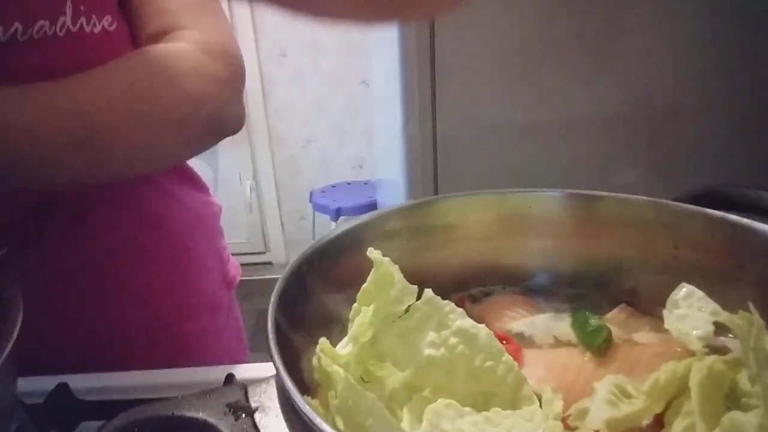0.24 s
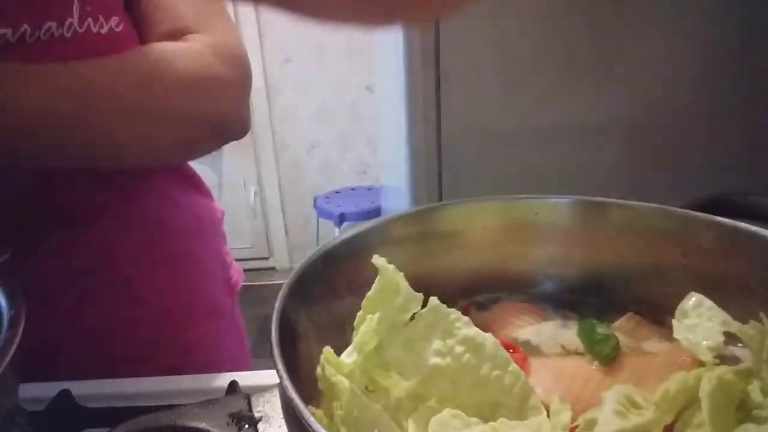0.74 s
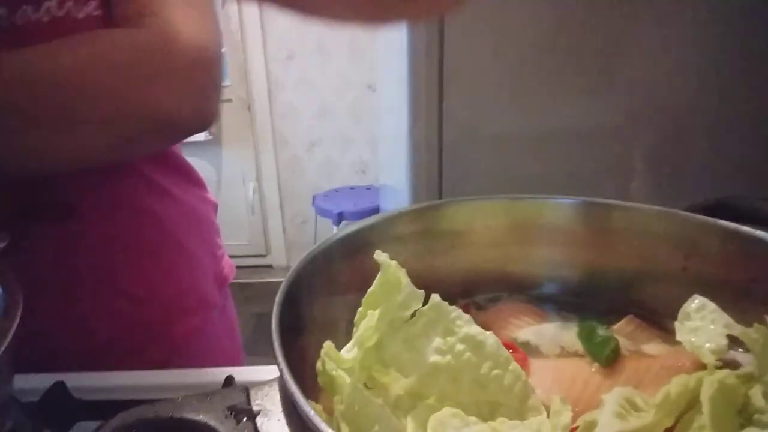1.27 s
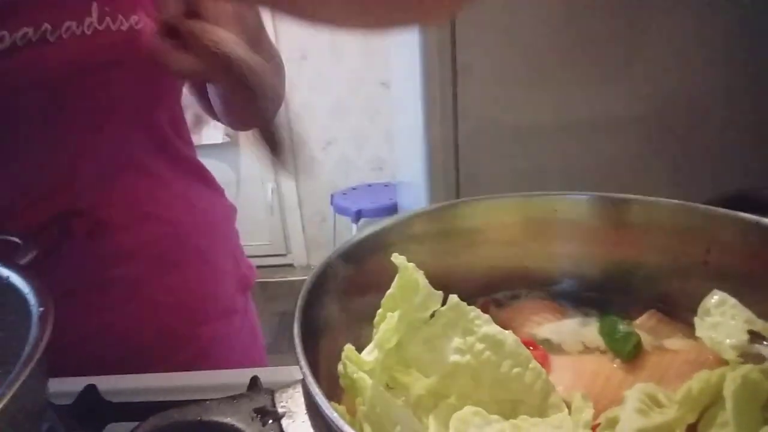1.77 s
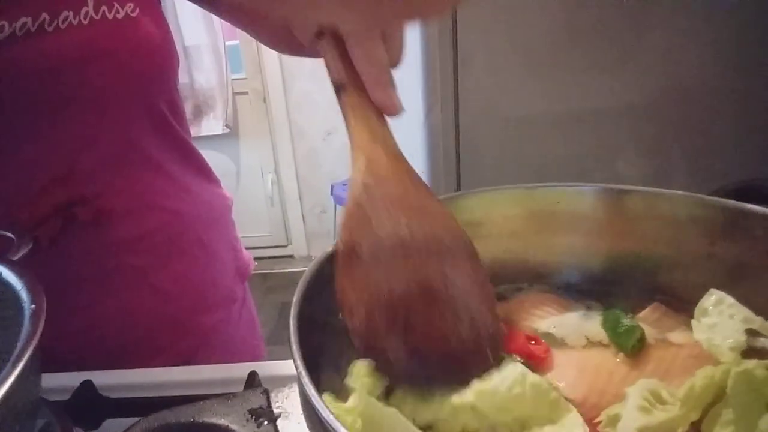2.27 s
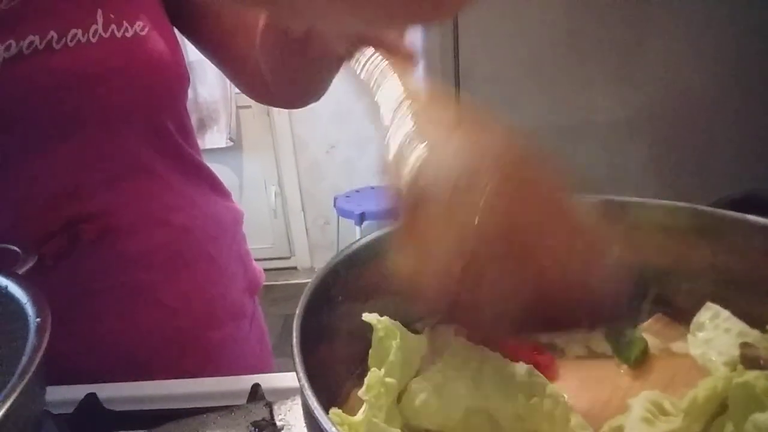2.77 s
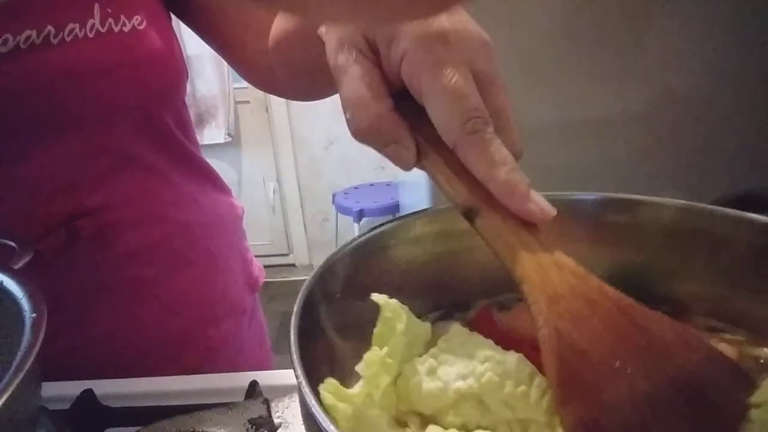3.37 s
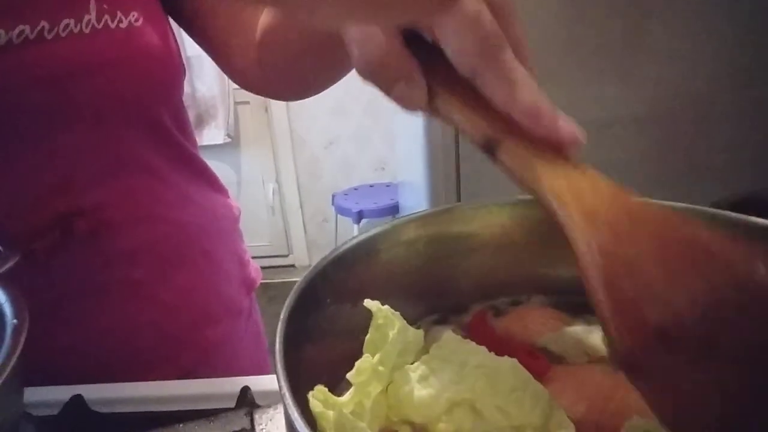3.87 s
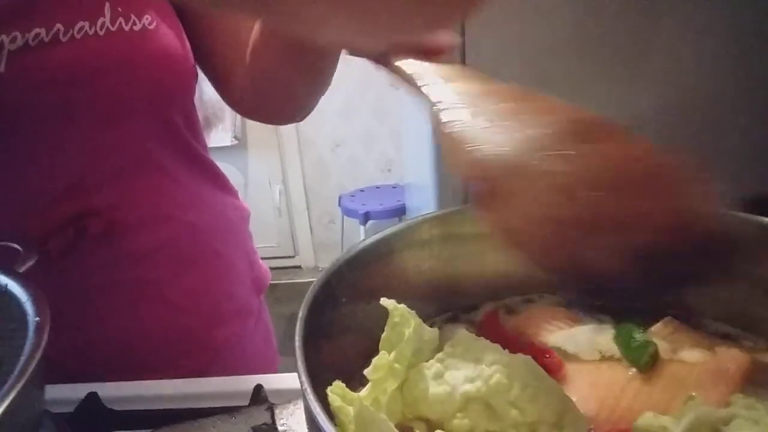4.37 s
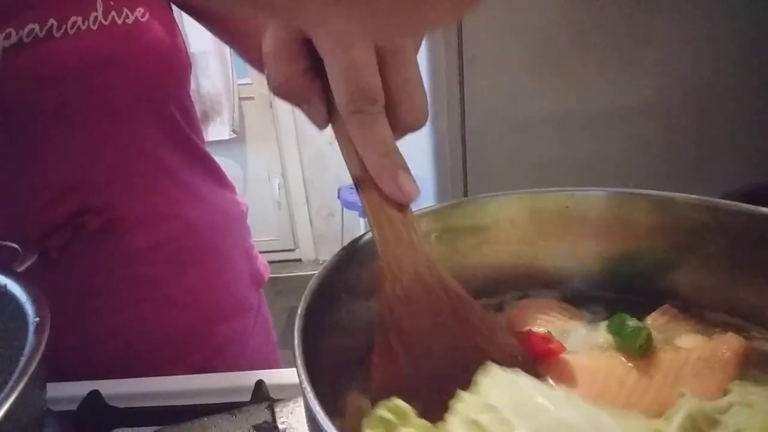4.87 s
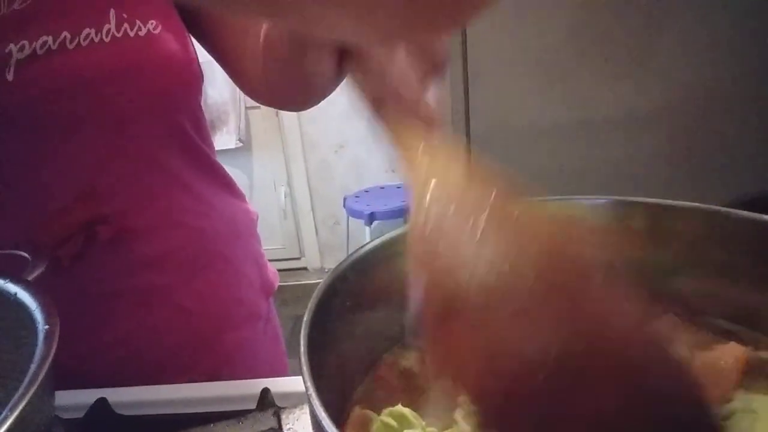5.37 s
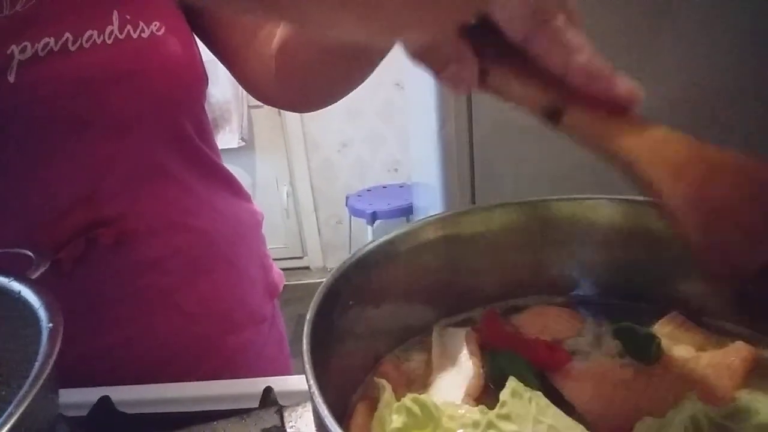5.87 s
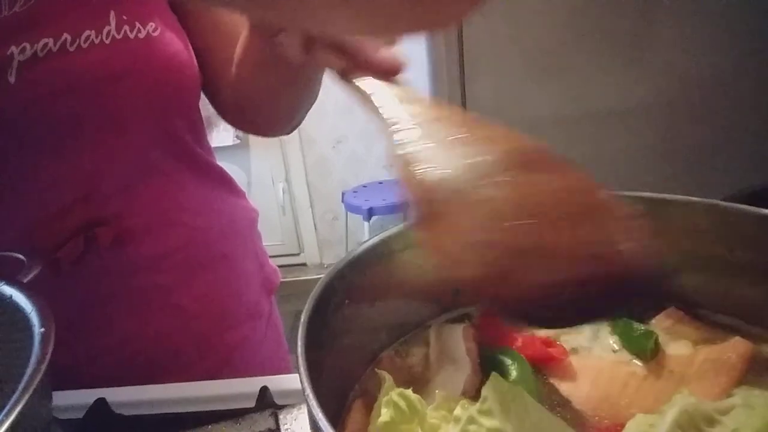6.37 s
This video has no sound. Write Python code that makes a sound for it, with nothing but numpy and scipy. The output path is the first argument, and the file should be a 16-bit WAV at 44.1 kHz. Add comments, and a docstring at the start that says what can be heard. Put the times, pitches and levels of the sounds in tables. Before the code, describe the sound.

Faint leafy crunches and light taps, then two hard, briefly ringing wooden spoon knocks on a steel pot, with a kitchen fan humming.

```python
"""Pressing cabbage into a steel pot

A wooden spoon pushes leaves and vegetables down in a full pot on a stove: they rub, snap and squeeze
bubbles out of the broth, and the spoon's edge taps. Two hard knocks excite the pot's modes, which the
food damps quickly; a softer bump comes at the end. An appliance fan hums throughout, a small kitchen
reverberates, and an automatic gain control lowers the level after the first knock."""
import sys
import numpy as np
from scipy import signal
from scipy.fft import rfft, irfft, next_fast_len
from scipy.io import wavfile
from scipy.ndimage import uniform_filter1d, map_coordinates

SR = 44100
rng = np.random.default_rng(int(sys.argv[2]) if len(sys.argv) > 2 else 0)


def transcribe(u):
    """Save the signal u as a 16-bit wav file named by the first command-line argument.

    u: samples, shape (n,) or (channels, n), limited to [-1, 1]; the rate is SR.
    q: integer samples, one column per channel.
    """
    v = np.clip(np.atleast_2d(u).T, -1, 1)
    q = np.round(v * 32767).astype(np.int16)
    wavfile.write(sys.argv[1], SR, q)


N = 292824

# Reverberation of the kitchen. Each row: frequency in Hz, t60 (time to fall 60 dB) in seconds.
KITCHEN_DECAY = [(80, 1), (300, 0.22), (1400, 0.3), (4000, 0.22), (8500, 0.22), (10000, 0.23),
                 (16000, 0.19)]
# Echoes from close walls. Each row: delay in seconds, gain in dB.
WALL_ECHOES = [(0.0097, -10.5), (0.0224, -17.5)]
# Resonances of the fan's housing. Each row: frequency in Hz, width in Hz, lift in dB.
HOUSING_RESONANCES = [(758, 210, 9.5), (1041, 32, 8.5), (1345, 47, 7.5), (1565, 150, 8.5), (2040, 25, -4),
                      (2670, 150, 10.5), (4116, 295, 10.5), (5340, 95, 10), (12030, 1250, 6.5)]
# Tones of the fan's motor. Each row: frequency in Hz, rms level in dB, waver from 0 to 1.
MOTOR_TONES = [(96.8, -57, 0.1), (169.3, -57.5, 0.37), (248.2, -60, 0.29), (1590, -63.5, 1),
               (2625, -68.5, 0.87)]
# The spoon is picked up, then slides through the leaves. Each row: start in seconds, length in seconds,
# level in dB, tilt in dB per octave, relative level of the dull bump in dB.
SPOON_STROKES = [(0.304, 0.044, -56.5, -1.5, 2), (0.419, .02, -53.5, -1, 3), (1.07, 0.054, -55.5, 2, 5.5),
                 (1.158, 0.015, -49, -2, 4.5), (1.178, 0.027, -43.5, 0, -10), (1.302, .018, -38, -0.8, -8),
                 (1.471, 0.028, -46, -4, 0.5), (2.094, 0.11, -52, 3, 1), (2.208, 0.13, -57, -2, 5),
                 (2.323, 0.22, -48, 2, -25), (3.06, 0.056, -55.5, 1, -12), (3.124, .086, -43, -0.5, -15),
                 (3.282, .1, -48.5, -1.5, -14), (3.443, 0.07, -52.5, -3.5, -1), (3.87, 0.15, -54, -3, -4),
                 (5.413, 0.046, -54, 0, -20)]
# Light taps of the spoon's edge. Each row: start in seconds, level in dB, tilt in dB per octave.
EDGE_TAPS = [(1.036, -43.5, -8), (1.0677, -34, -0.5), (1.475, -40, -5), (3.0502, -39, -11),
             (3.187, -29, -9), (3.29, -38, -14), (4.649, -31, -0.5), (4.7106, -35, -1), (4.752, -43, -6),
             (5.176, -50.5, 4), (5.437, -43, -4), (5.7133, -46, 4), (5.908, -24, -4), (6.019, -20.5, -0.5)]
# Crisp wet leaves breaking. Each row: start in seconds, level in dB.
CLEAR_SNAPS = [(1.4257, -47), (1.453, -39.5), (1.469, -47), (2.32, -41), (2.4235, -34.5), (2.5023, -33),
               (3.542, -46), (4.7002, -38), (4.7757, -33.5), (4.806, -44), (5.483, -39)]
# Blows on the pot. Each row: start in seconds, level in dB, place from 0 (upper wall) to 1 (low down),
# low cut-off in Hz, contact cut-off in Hz, crack in dB, boom in dB, boom t60 in seconds, slosh in dB.
# Crack, boom and slosh are relative to the blow's level.
SPOON_BLOWS = [(4.55, 0, 0.24, 760, 10900, -14.5, -26.5, 0.7, -38.5),
               (5.8965, 2.5, 1, 110, 3350, -15, -30, 0.6, -58),
               (6.6054, -25, 0.95, 118, 1820, -6.5, -5, 0.44, -37)]
# Broad damped modes and thin steel ring of the pot. Each row: frequency in Hz, t60 in seconds,
# level in dB when struck on the upper wall, level in dB when struck low down.
POT_MODES = [(251, 0.045, -59, -15), (272.7, 0.35, -44, -27.5), (315, 0.27, -12, -31),
             (416, 0.39, -21, -32), (532, 0.1, -54, -16.5), (614, 0.043, -26, -14.5),
             (720.5, 0.28, -25, -48), (920, 0.02, -23, -18), (992, 0.4, -26, -55), (1000, 0.062, -41, -35),
             (1215, 0.38, -29, -64), (1345, 0.24, -45, -30), (1362, 0.039, -2.5, -8),
             (1430, 0.19, -47, -31), (1464, 0.17, -25, -26.5), (1590, 0.26, -37, -35),
             (1634, 0.049, -36, -28), (1960, 0.021, -7.5, -11.5), (1840, 0.24, -42, -30),
             (2072, 0.092, -13, -41), (2125, 0.03, -37, -8.5), (2475, 0.031, -34, -15.5),
             (2430, 0.04, -36, -36), (2640, 0.022, -13.5, -10.5), (3350, 0.022, -12, -24),
             (4170, 0.056, -30, -39), (5420, 0.046, -41, -24), (8740, 0.22, -42, -39)]
# Spectra of the noisy sources. Each row: frequency in Hz, relative level in dB.
AIR_SPECTRUM = [(25, -13), (45, -10.5), (75, -1), (130, 2.5), (200, -0.5), (310, -1), (450, -6.5),
                (650, -7), (930, -12), (1350, -5), (1900, -7.5), (2750, -9), (3100, -16.5), (6500, -22),
                (10000, -26), (16000, -29.5)]  # air rushing through the fan
RUB_SPECTRUM = [(300, -38), (1000, -4), (2200, -2), (3200, -2), (5000, -2), (8000, -7), (10000, -13.5),
                (16000, -15)]  # leaves rubbing
TAP_SPECTRUM = [(700, -34), (1700, -2), (3000, -5.5), (4800, 1.5), (6000, 0), (7000, -4), (8200, -1.5),
                (9300, -9.5), (12500, -6), (16000, -17)]  # the spoon's edge
CRACK_SPECTRUM = [(300, -54), (800, 9.5), (1250, 11), (2000, -12), (3800, 1.5), (5000, 0), (6600, -10.5),
                  (7600, -2.5), (8600, -6.5), (9400, -23), (16000, -31)]  # wood striking steel
BOOM_SPECTRUM = [(30, -40), (50, -18), (66, 4), (77, 12), (92, 7.5), (200, 0), (400, -5.5), (650, -4),
                 (1200, -35)]  # the kitchen's low boom after a blow
SLOSH_SPECTRUM = [(40, -18), (90, 13), (280, 12.5), (500, 9), (750, -12.5), (1300, -38)]  # food swinging back after a blow

STIR_FROM_S = 2  # bubbles and faint snaps occur from here on


def amp(db):
    """Amplitude grows tenfold for every 20 dB."""
    return 10 ** (np.asarray(db) / 20)


def unit(x):
    """Normalisation scales a signal to rms 1."""
    return x / np.sqrt(np.mean(x ** 2) + 1e-20)


def along(points, hz):
    """Interpolation reads (Hz, value) points on a logarithmic frequency axis."""
    f, v = np.transpose(points)
    return np.interp(np.log(hz + 1), np.log(f + 1), v)


def wobble(rate, size=N):
    """A spline through random knots, rate of them a second, gives a smooth fluctuation."""
    return map_coordinates(rng.standard_normal(int(size * rate / SR) + 4), [np.arange(size) * rate / SR])


def ripple(hz, spacing_hz):
    """Small random resonances, new for every contact, ripple the spectrum."""
    return map_coordinates(rng.standard_normal(int(SR / spacing_hz) + 4), [hz / spacing_hz])


def coloured(x, gain_db):
    """Filtering multiplies the spectrum by a gain, given in dB as a function of frequency."""
    m = next_fast_len(len(x) + 8192)
    return irfft(rfft(x, m) * amp(gain_db(np.fft.rfftfreq(m, 1 / SR))), m)[:len(x)]


def noise(gain_db, size):
    """Filtered white noise takes the filter's spectrum; its rms is set to 1."""
    return unit(coloured(rng.standard_normal(size), gain_db))


def envelope(t, length, attack, release):
    """A smooth gate rises around time 0 and falls around the given length."""
    return (1 + np.tanh(t / attack)) * (1 - np.tanh((t - length) / release)) / 4


def add(track, s, sound):
    """Superposition: a sound adds to the track from s seconds on."""
    start = max(round(s * SR), 0)
    part = track[start:start + len(sound)]
    part += sound[:len(part)]


def in_kitchen(x, wet_db, build_s=0.0013):
    """Reverberation: reflections build up into a diffuse tail that decays exponentially."""
    hz, t, spectra = signal.stft(rng.standard_normal(SR // 2), SR, nperseg=256)
    decay = amp(-60 * t / along(KITCHEN_DECAY, hz)[:, None])
    tail = signal.istft(spectra * decay, SR, nperseg=256)[1]
    tail *= 1 - np.exp(-(np.arange(len(tail)) / SR / build_s) ** 2)
    return x + amp(wet_db) * signal.fftconvolve(x, tail / np.linalg.norm(tail))[:len(x)]


def fan(air_db=-48):
    """Resonance of the housing colours the rushing air, while the motor hums on a few wavering tones."""
    t = np.arange(N) / SR
    housing_db = lambda f: sum(lift / (1 + (2 * (f - hz) / width) ** 2)
                               for hz, width, lift in HOUSING_RESONANCES)
    rush = noise(lambda f: along(AIR_SPECTRUM, f) + housing_db(f), N)
    air = unit(in_kitchen(rush, wet_db=-8.5)) * amp(air_db + 0.72 * wobble(6.6))
    hum = np.zeros(N)
    for hz, db, waver in MOTOR_TONES:
        peak = np.sqrt(2) * amp(db + 1.9 * waver * wobble(6.1))
        hum += peak * np.sin(2 * np.pi * hz * t + 3 * waver * wobble(8))
    return air + hum


def strokes(grain_db=4, snaps_per_s=260, snap_db=-4, crunch_db=1.45, brush_db=-14, brush_s=0.059):
    """Friction is a swell of tiny slips and sparse wet snaps, with a dull bump as things shift."""
    out, t = np.zeros(N), np.arange(SR * 3 // 4) / SR - 1 / 4
    bump_colour = lambda f: along([(40, -13), (90, 3.5), (300, 5.0), (550, -2.5), (1200, -25.0)], f)
    for s, length, db, tilt_db, bump_db in SPOON_STROKES:
        slips = unit(rng.standard_normal(len(t)) * amp(grain_db * rng.standard_normal(len(t))))
        snaps = unit((rng.random(len(t)) < snaps_per_s / SR) * rng.standard_normal(len(t)))
        colour = lambda f: (along(RUB_SPECTRUM, f) + tilt_db * np.log2((f + 1) / 4000)
                            + ripple(f, spacing_hz=224))
        rub = unit(coloured(slips + amp(snap_db) * snaps, colour))
        bump = amp(bump_db) * noise(bump_colour, len(t))
        press = envelope(t, length, attack=0.13 * length, release=0.3 * length)
        press *= amp(crunch_db * wobble(rate=70, size=len(t)))  # leaves give way in clumps
        # a lighter touch leads into each stroke and trails it
        brush = amp(brush_db) * envelope(t + brush_s, length + 2 * brush_s, brush_s, brush_s)
        stroke = amp(db) * np.maximum(press, brush) * (rub + bump)
        add(out, s + t[0], in_kitchen(stroke, wet_db=-7.5))
    return out


def click(gain_db, t60, ripple_db=1.2):
    """A brief contact excites small resonances that decay exponentially, and the kitchen answers."""
    t = np.arange(SR // 3) / SR
    burst = noise(lambda f: gain_db(f) + ripple_db * ripple(f, spacing_hz=333), len(t))
    return in_kitchen(amp(-60 * t / t60) * burst, wet_db=-4.5)


def taps():
    """Contact stiffness sets brightness: the harder the spot the spoon's edge meets, the more treble."""
    out = np.zeros(N)
    for s, db, tilt_db in EDGE_TAPS:
        colour = lambda f: along(TAP_SPECTRUM, f) + tilt_db * np.log2(1 + f / 1000)
        add(out, s, amp(db) * click(colour, t60=0.032))
    return out


def leaf_snaps(band_hz=9800, half_width_octaves=1.2, faint_per_s=3, faint_db=-56, spread_db=3):
    """Fracture of wet leaves clicks in one high band: a few clear snaps, and faint ones at random."""
    out, stir_s = np.zeros(N), N / SR - STIR_FROM_S
    band = lambda f: (-10 * np.log10(1 + (np.log2((f + 1) / band_hz) / half_width_octaves) ** 6)
                      - 3 * np.log2(1 + f / band_hz))
    faint = [(STIR_FROM_S + when * stir_s, faint_db + spread_db * (2 * force - 1))
             for when, force in rng.random((int(faint_per_s * stir_s), 2))]
    for s, db in CLEAR_SNAPS + faint:
        add(out, s, amp(db) * click(band, t60=0.02))
    return out


def bubbles(per_s=56, centre_hz=1660, spread_octaves=0.71, t60_cycles=36, lift_db=6.5, rise=0.15):
    """Each bubble that a stroke squeezes from the broth rings as a damped oscillator of rising pitch."""
    out, t = np.zeros(N), np.arange(SR // 8) / SR
    for s, length, db, _, _ in SPOON_STROKES:
        if s < STIR_FROM_S:
            continue
        for when, pitch, force in rng.random((round(per_s * length), 3)):
            hz = centre_hz * 2 ** (spread_octaves * (2 * pitch - 1))
            age = t * hz / t60_cycles
            chirp = np.sin(2 * np.pi * hz * t * (1 + rise * age))
            add(out, s + when * length, force * amp(db + lift_db - 60 * age) * chirp)
    return in_kitchen(out, wet_db=-10)


def pot_ring(t, place, blur_hz=7):
    """Modal vibration: the pot rings as a sum of damped sines, weighted by the place of the blow."""
    hz, t60, wall_db, low_db = np.transpose(POT_MODES)[:, :, None]
    # neighbouring modes push the air in opposite senses
    sense = np.cos(np.pi * np.arange(len(POT_MODES)))[:, None]
    decay = amp(-60 * t / t60) * (1 - np.exp(-t / 0.00045))
    # shifting food loads the wall unevenly and blurs the pitch of each mode
    drift = np.cumsum(rng.standard_normal(decay.shape), axis=1) * np.sqrt(2 * np.pi * blur_hz / SR)
    modes = sense * decay * np.sin(2 * np.pi * hz * t + drift)
    return np.sum(amp((1 - place) * wall_db + place * low_db) * modes, axis=0)


def crack(t, t60=0.027, shimmer_db=-22, shimmer_t60=0.65):
    """Broadband excitation: wood cracks on steel and leaves a shimmer of countless weak modes."""
    fade = amp(-60 * t / t60) + amp(shimmer_db - 60 * t / shimmer_t60)
    return fade * noise(lambda f: along(CRACK_SPECTRUM, f), len(t))


def low_boom(t, t60, rise_share=0.046):
    """Room modes build up: a low boom swells in the kitchen just after each blow, then dies away."""
    swell = (1 - np.exp(-(t / (rise_share * t60)) ** 2)) * amp(-60 * t / t60)
    return swell * noise(lambda f: along(BOOM_SPECTRUM, f), len(t))


def slosh(t, delay_s=0.17, spread_s=0.044):
    """The food lags the blow and swings back in one surge of low noise."""
    surge = np.exp(-0.5 * ((t - delay_s) / spread_s) ** 2)
    return surge * noise(lambda f: along(SLOSH_SPECTRUM, f), len(t))


def knocks(push_db=-3.5, push_width_s=0.00018):
    """Impulsive excitation: at each blow the pot cracks and rings, the room booms and the food sloshes."""
    out, t = np.zeros(N), np.arange(SR * 3 // 4) / SR
    u = t / push_width_s - 2
    push = -amp(push_db) * 2 * u * np.exp(-u ** 2)  # first push of wood on steel: a Gaussian's slope
    for s, db, place, low_hz, contact_hz, crack_db, boom_db, boom_t60, slosh_db in SPOON_BLOWS:
        # the thin wall radiates no bass, and softer contact takes the treble away
        band = signal.butter(2, [low_hz, contact_hz], "bandpass", fs=SR, output="sos")
        direct = signal.sosfilt(band, push + pot_ring(t, place) + amp(crack_db) * crack(t))
        blow = in_kitchen(direct, wet_db=-8, build_s=0.0026)
        for delay, echo_db in WALL_ECHOES:
            add(blow, delay, amp(echo_db) * direct)
        bass = amp(boom_db) * low_boom(t, boom_t60) + amp(slosh_db) * slosh(t)
        add(out, s, amp(db) * (blow + bass))
    return out


def gain_control(x, threshold_db=-27.5, slope=0.28, window_s=0.041, attack_s=0.14, recovery_db_per_s=0.4):
    """Compression: the gain falls by slope dB for each dB over the threshold, then creeps back."""
    power = np.abs(uniform_filter1d(x ** 2, int(window_s * SR)))
    level_db = 10 * np.log10(power + 1e-12)
    wanted_db = slope * np.maximum(level_db - threshold_db, 0)
    recovered_db = recovery_db_per_s * np.arange(N) / SR
    held_db = np.maximum.accumulate(wanted_db + recovered_db) - recovered_db
    step = 1 / (attack_s * SR)
    cut_db = signal.lfilter([step], [1, step - 1], held_db)
    return x * amp(-cut_db)


def scene():
    """The sounds of spoon, pot, food and fan superpose in one channel."""
    return (knocks() + fan() + taps() + strokes() + leaf_snaps() + bubbles())[None]


def record(dry, low_hz=50, top_hz=15950):
    """Limited bandwidth and headroom: the sound loses deep bass, is compressed, clips and is low-passed."""
    thin = signal.sosfilt(signal.butter(3, low_hz, "highpass", fs=SR, output="sos"), dry[0])
    clipped = np.clip(gain_control(thin), -1, 1)
    return coloured(clipped, lambda f: np.where(f < top_hz, 0, -120))[None]


dry = scene()
out = record(dry)
transcribe(out)
```